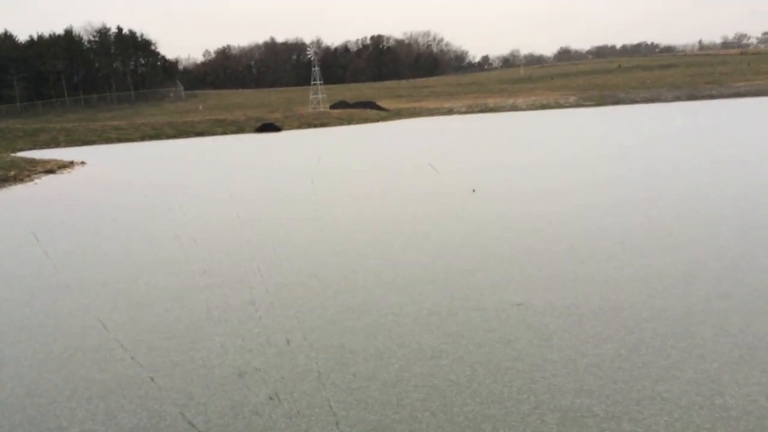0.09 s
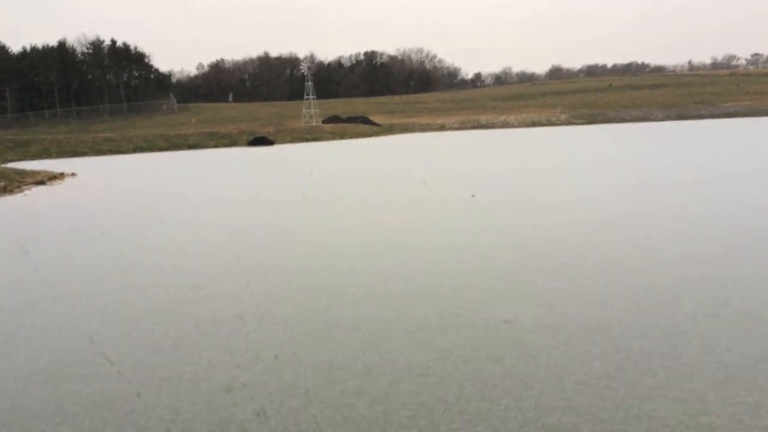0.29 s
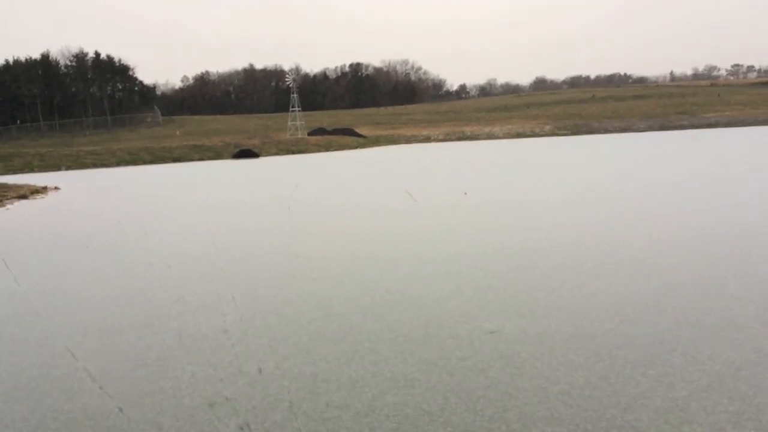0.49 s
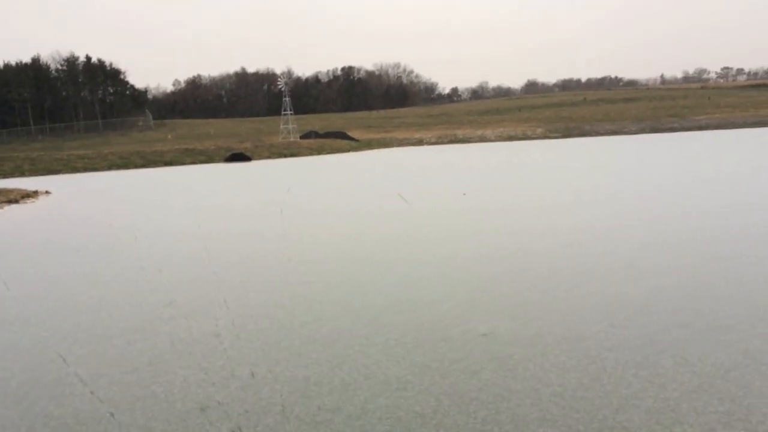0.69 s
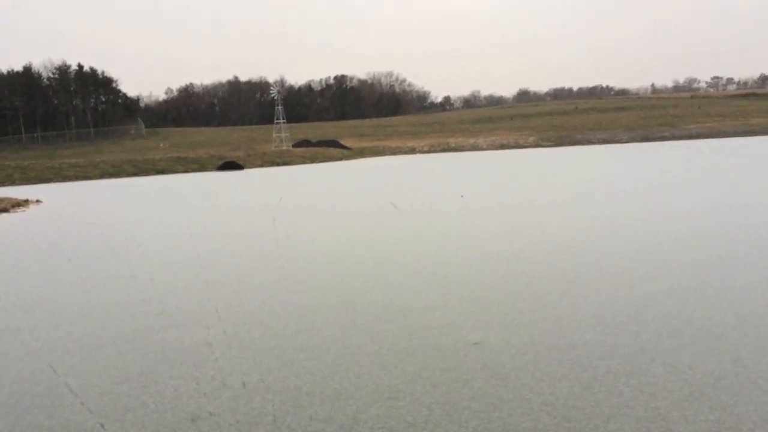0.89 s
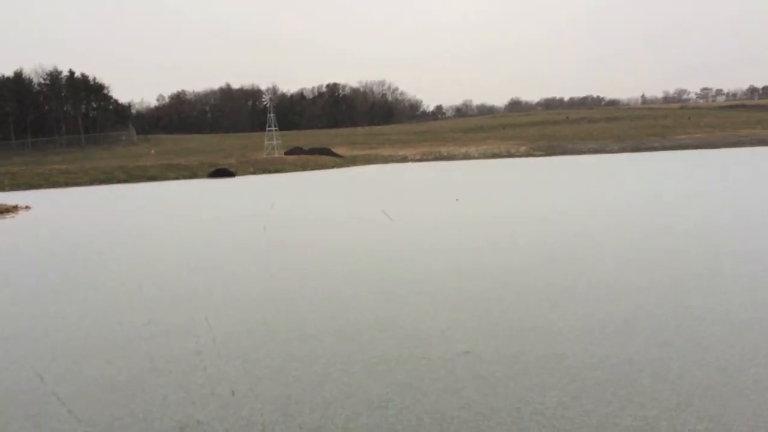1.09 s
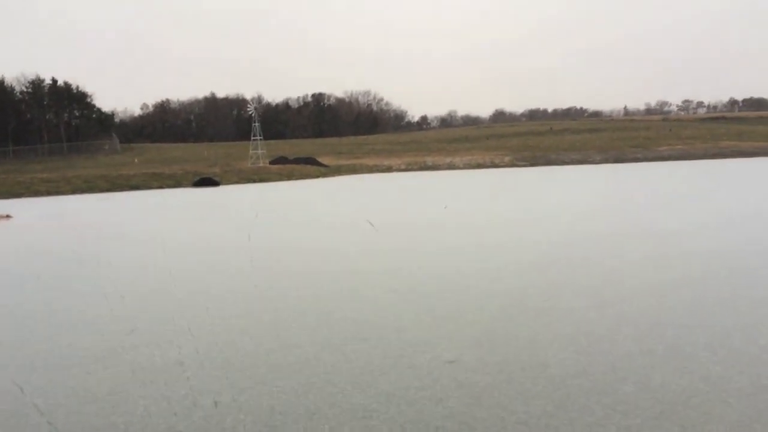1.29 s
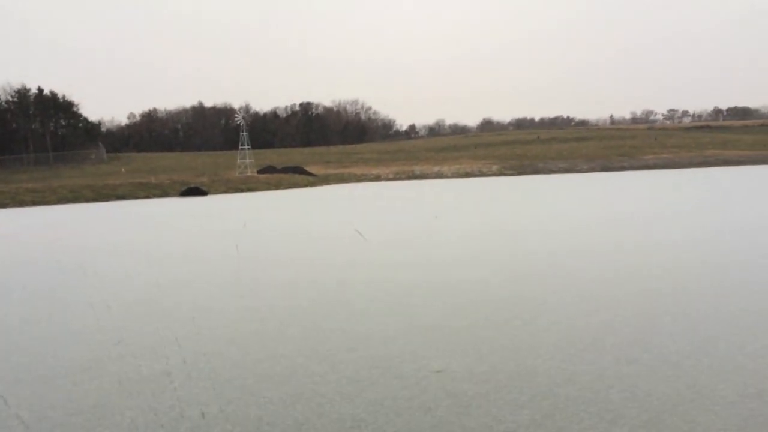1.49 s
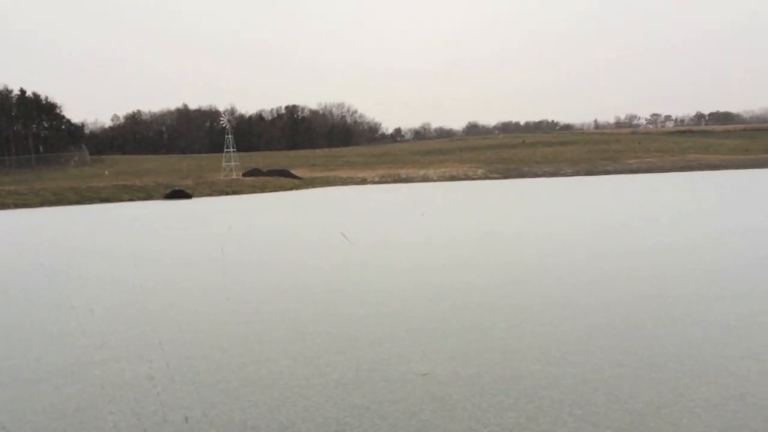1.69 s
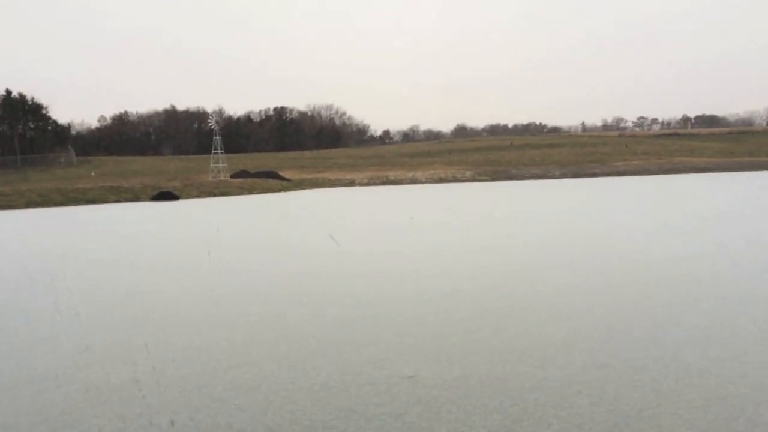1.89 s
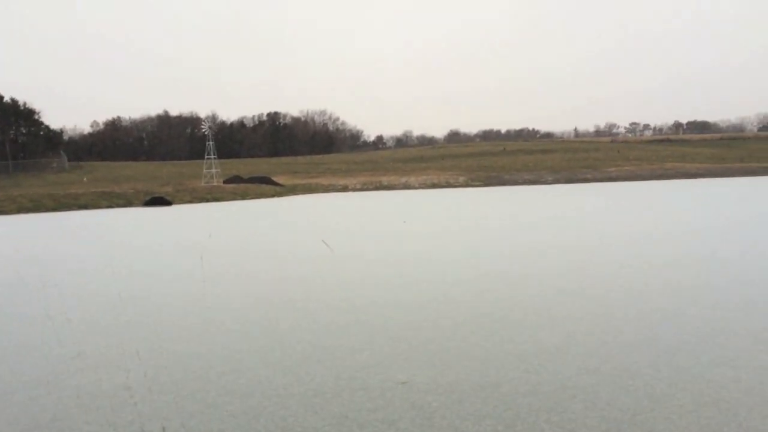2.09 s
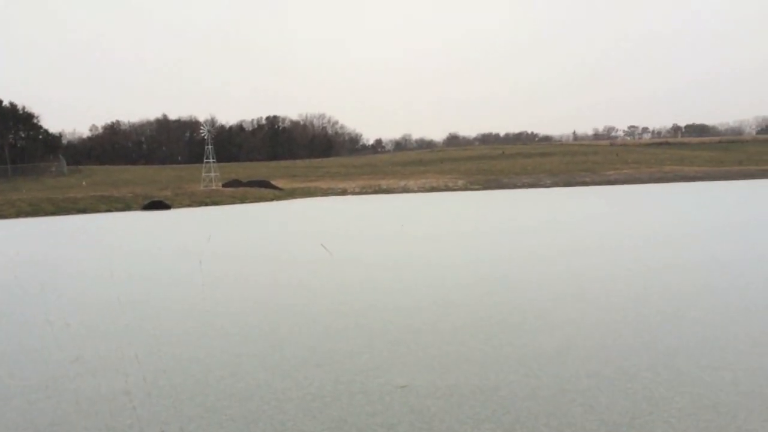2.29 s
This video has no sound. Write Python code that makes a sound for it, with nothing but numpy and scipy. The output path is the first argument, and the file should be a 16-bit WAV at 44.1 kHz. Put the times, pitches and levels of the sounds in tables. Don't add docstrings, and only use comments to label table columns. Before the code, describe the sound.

A stone skips away over thin pond ice, each bounce a short falling chirp ending in a click, with a hollow ringing echo; faint ice ticks, low distant rumble and soft hiss, outdoors on a handheld camera microphone.

```python
import sys
import numpy as np
from scipy import signal
from scipy.fft import rfft, irfft, next_fast_len
from scipy.io import wavfile

SR = 44100
rng = np.random.default_rng(int(sys.argv[2]) if len(sys.argv) > 2 else 0)


def volts_from_decibels(level):
    exponent = np.asarray(level, float) / 20
    return 10 ** exponent


def unload_audio(sound):
    columns = np.transpose(np.atleast_2d(sound))
    steps = np.round(np.clip(columns, -1, 1) * 32767)
    wavfile.write(sys.argv[1], SR, steps.astype(np.int16))


N = 101430


def unit(x):
    return x / np.sqrt(np.mean(x ** 2) + 1e-20)


def peak(x):
    return x / np.abs(x).max()


def along(points, hz):
    f, v = np.transpose(points)
    return np.interp(np.log(hz + 1), np.log(f + 1), v)


def filtered(x, response):
    m = next_fast_len(len(x) + SR // 2)
    return irfft(rfft(x, m) * response(np.fft.rfftfreq(m, 1 / SR)), m)[:len(x)]


def band(centre_hz, width_hz):
    return lambda f: 1j * f * width_hz / (centre_hz ** 2 - f * f + 1j * f * width_hz)


def add(track, s, x):
    part = track[round(s * SR):][:len(x)]
    part += x[:len(part)]


def stone():
    # airborne click in seconds, strength in dB, click in dB, contact time in ms, ring exponent from 0 to 2.
    contacts = [(0.2434, -27, -46.5, 0.69, 0.95), (0.4577, -59, -84, 0.23, 0.96),
                (0.4675, -42.5, -79, .3, 0.73), (0.4697, -18.5, -42.5, .2, 1.13), (.800, -32, -76, .4, 1.1),
                (0.8023, -36, -61.5, 0.27, 0.92), (.993, -38, -65, 0.39, 0.98),
                (1.0084, -43.5, -60, 0.23, 1.05), (1.3636, -33, -62, 0.34, 1.57),
                (1.3673, -44.5, -67, 0.44, 1.3), (1.651, -42.5, -82, 0.33, 1.22),
                (1.6587, -36.5, -74, 0.39, 1), (1.6666, -28.5, -58.5, .3, 1.25),
                (2.026, -31.5, -65, 0.3, 1.68), (2.0326, -34.5, -60, 0.42, 1.07),
                (2.232, -51.5, -71, 0.43, .25), (2.2449, -49, -71, 0.47, .15)]
    # time in seconds, distance in metres.
    path = [(.24, 11.2), (.47, 12.5), (.8, 14.5), (1, 15.9), (1.36, 17.8), (1.66, 18.8), (2.03, 20.4),
            (2.24, 20.7)]
    same_skip_s = 0.06
    out, last, echo = np.zeros(N), -1, None
    for s, db, click_db, touch_ms, ring in contacts:
        if s - last > same_skip_s:
            echo = answer()
        last = s
        metres = np.interp(s, *np.transpose(path))
        flight, chirp, click = contact(metres, click_db, touch_ms, ring)
        blow = volts_from_decibels(db + 2) * chirp + volts_from_decibels(16.5) * click
        add(out, s - flight, blow)
        add(out, s - flight, signal.fftconvolve(blow[:2 ** 12], echo))
    return out


def contact(metres, click_db, touch_ms, ring):
    # frequency in Hz, level in dB.
    shore = [(250, -33), (400, -17), (550, -7), (900, 2.5), (1300, -9), (2500, -43.5)]
    # frequency in Hz, level in dB.
    click_colour = [(400, -9), (2000, -11.5), (6000, -0.5), (10000, -8.5), (15000, -10.5)]
    sound_m_s, ear_m = 331, 2.37
    match_hz, bend_power = 1145, 0.676
    span = 2 ** 15
    hz, t = np.fft.rfftfreq(span, 1 / SR) + 1e-3, np.arange(span) / SR
    k_air = 2 * np.pi * hz / sound_m_s
    slow = (match_hz / hz) ** bend_power
    flight = np.hypot(metres, ear_m) / sound_m_s

    u = hz * touch_ms / 1000
    force = np.sinc(u - 0.5) + np.sinc(u + 0.5) + 0.08j * u / (1 + u * u)
    force = force / (1 + (hz / 2500) ** 2) ** 0.6

    travel = volts_from_decibels(-0.22 * metres * hz / 1000) * np.exp(-1j * k_air * slow * metres)
    wave = force * travel

    steep = np.sqrt(1 - slow ** 2 - 0.002j)
    leak = peak(irfft(wave * np.exp(-1j * k_air * ear_m * steep) / steep ** ring))
    cut_s = 0.00013
    leak = leak / (1 + np.exp(np.clip((t - flight) / cut_s, -50, 50)))

    under = peak(irfft(wave * volts_from_decibels(along(shore, hz)) * np.exp(-2j * np.pi * hz * 0.009)))
    under_db = -13 + 0.4 * (metres - 14)

    thud = volts_from_decibels(click_db + 42) * abs(band(4000, 4000)(hz)) ** 2
    click = peak(irfft((volts_from_decibels(along(click_colour, hz)) + thud) * np.exp(-2j * np.pi * hz * flight)))
    return flight, leak + volts_from_decibels(under_db) * under, volts_from_decibels(click_db) * click


def answer():
    # frequency in Hz, time to fall 60 dB in seconds.
    banks_t60 = [(400, .25), (900, .35), (1200, 0.34), (1600, 0.26), (4000, .28), (10000, 0.11)]
    # centre in Hz, width in Hz, level in dB.
    singing = [(1210, 220, -42), (720, 200, -32.5)]
    banks = volts_from_decibels(-18) * tail(lambda hz: along(banks_t60, hz), slope=0.9)
    haze = tail(lambda hz: 2.58 + 0 * hz, slope=0)
    far = sum(volts_from_decibels(db) * filtered(haze, band(hz, width)) for hz, width, db in singing)
    return banks + volts_from_decibels(7.5) * far


def tail(t60, slope):
    delay_s, rise_s = 0.002, 0.0044
    slope_s, slope_spread_s = 0.044, 0.014
    hz, t, z = signal.stft(rng.standard_normal(SR), SR, nperseg=256)
    x = signal.istft(z * volts_from_decibels(-60 * t / t60(hz)[:, None]), SR, nperseg=256)[1]
    t = np.arange(len(x)) / SR
    rise = 1 - np.exp(-t / rise_s)
    copy = slope * np.exp(-((t - slope_s) / slope_spread_s) ** 2)
    x = x * (rise + copy)
    return np.pad(x / np.linalg.norm(x), (round(delay_s * SR), 0))


def cracks():
    crack_s = [.017, .768, .953, 1.323, 1.634, 1.973]
    # level in dB, length in seconds.
    splinters = [
        (-53, 0.0014),
        (-56.5, 0.011),
        (-63.5, 0.0079),
        (-57, 0.00574),
        (-56.5, .004),
        (-61, 0.0031),
    ]
    # frequency in Hz, level in dB.
    colour = [(2000, -5), (5000, -6.5), (10000, -6), (15000, -7)]
    out = np.zeros(N)
    t = np.arange(SR // 40) / SR
    for s, (db, length) in zip(crack_s, splinters):
        burst = rng.standard_normal(len(t)) * np.exp(-(t / length) ** 2)
        add(out, s, volts_from_decibels(db + 4) * burst)
    return filtered(out, lambda hz: volts_from_decibels(along(colour, hz)))


def air():
    # frequency in Hz, level in dB per Hz.
    colour = [(20, -39.5), (45, -9.5), (75, -4.5), (120, -5.5), (260, -23), (700, -27), (1800, -36.5),
              (15300, -45.5)]
    # time in seconds, level in dB.
    swelling = [
        (0.0, -66.5),
        (1.3, -66),
        (1.43, -61.5),
        (1.86, -65.5),
        (2.06, -60),
        (2.3, -64),
    ]
    # centre in Hz, width in Hz, level in dB.
    murmur = [(1100, 360, -84)]
    s, level_db = np.transpose(swelling)
    swell = volts_from_decibels(np.interp(np.arange(N) / SR, s, level_db - level_db.mean()))
    bed = volts_from_decibels(-64) * unit(filtered(rng.standard_normal(N), lambda hz: volts_from_decibels(along(colour, hz))))
    rumble = filtered(bed, lambda hz: 1 / (1 + (hz / 250) ** 4))
    hiss = bed - rumble
    out = hiss + swell * rumble
    for centre_hz, width_hz, db in murmur:
        resonance = band(centre_hz, width_hz)
        out = out + volts_from_decibels(db) * unit(filtered(rng.standard_normal(N), lambda f: resonance(f) ** 2))
    return out


def scene():
    return (stone() + cracks() + air())[None]


def roll_off(x):
    return signal.sosfilt(signal.butter(12, 15820, fs=SR, output="sos"), x)


def record(dry):
    heard = filtered(dry[0], lambda hz: hz < 15400)
    return roll_off(heard[None])


dry = scene()
out = record(dry)
unload_audio(out)
```